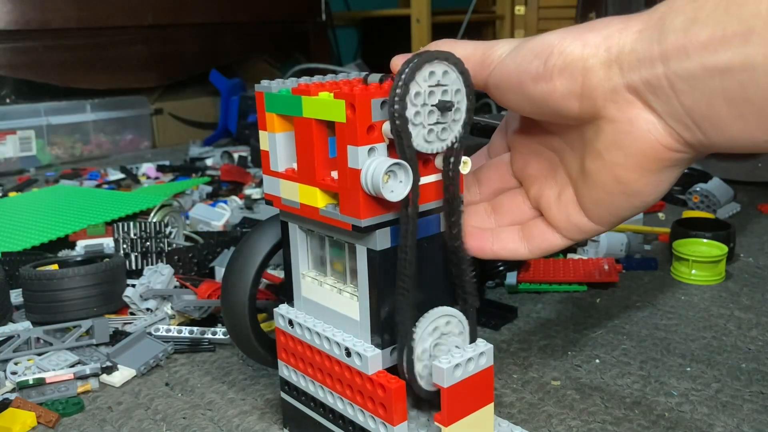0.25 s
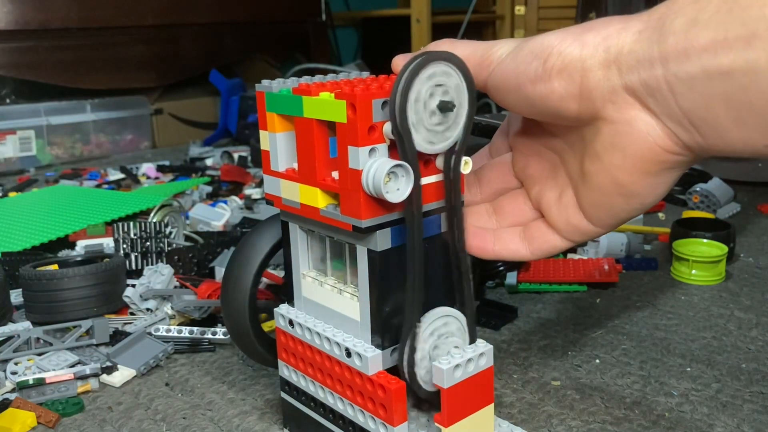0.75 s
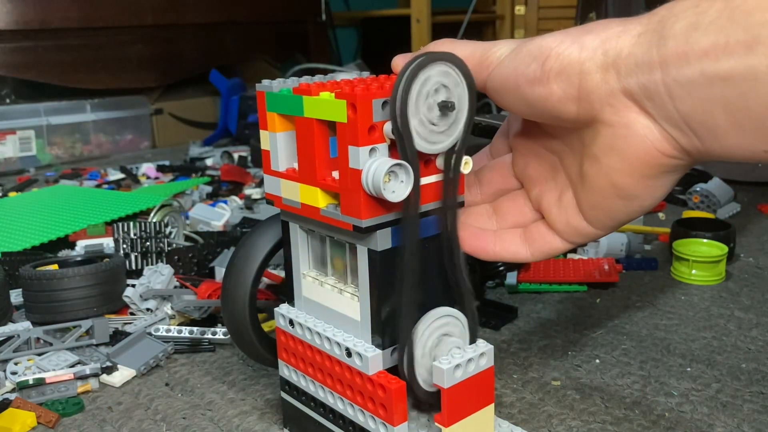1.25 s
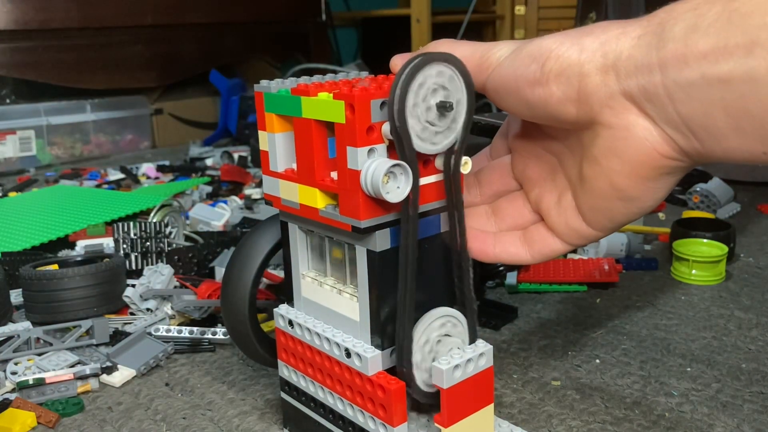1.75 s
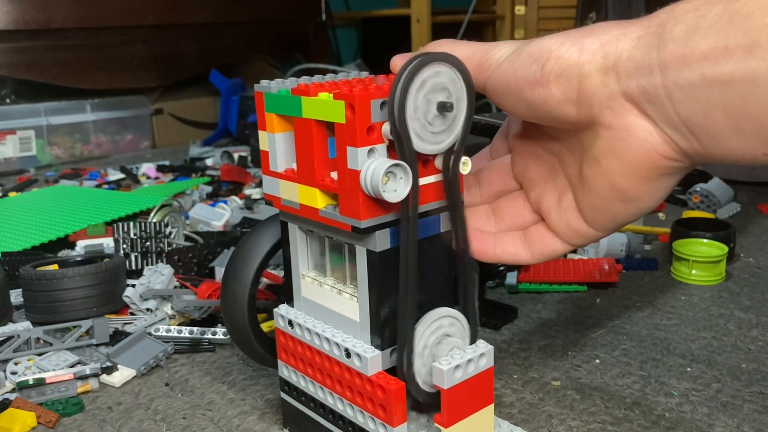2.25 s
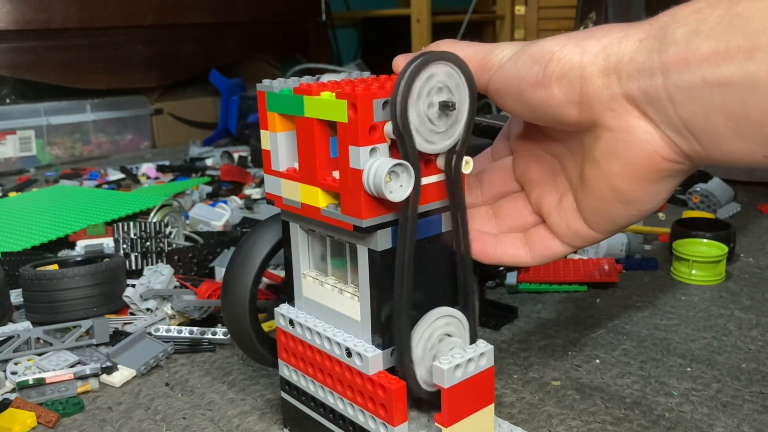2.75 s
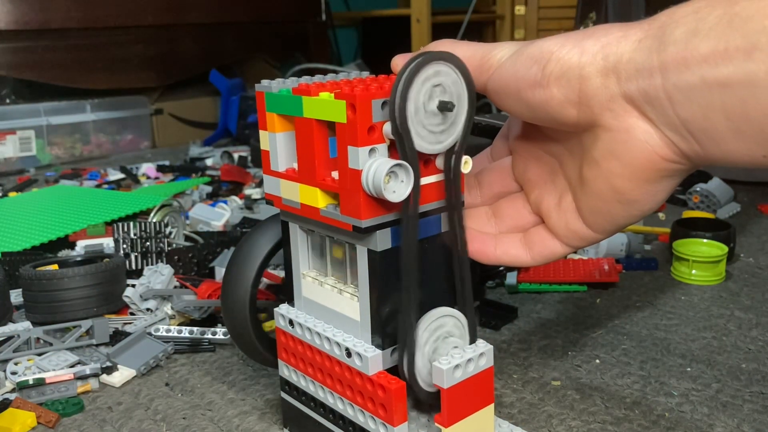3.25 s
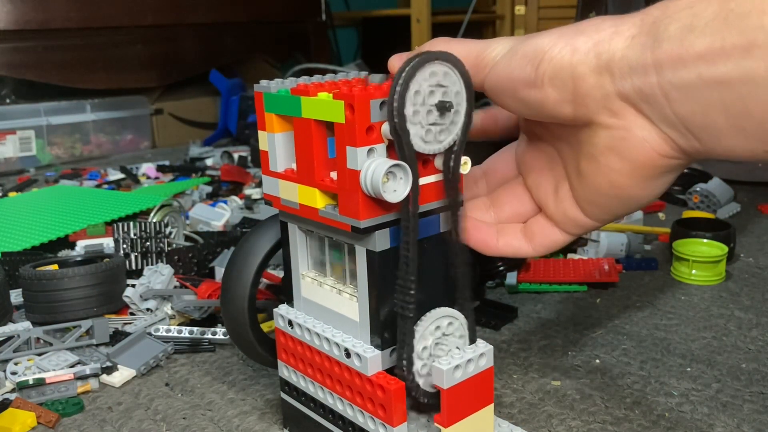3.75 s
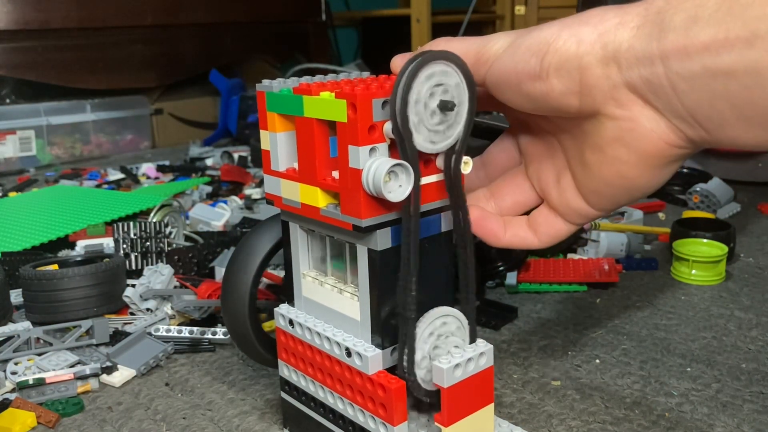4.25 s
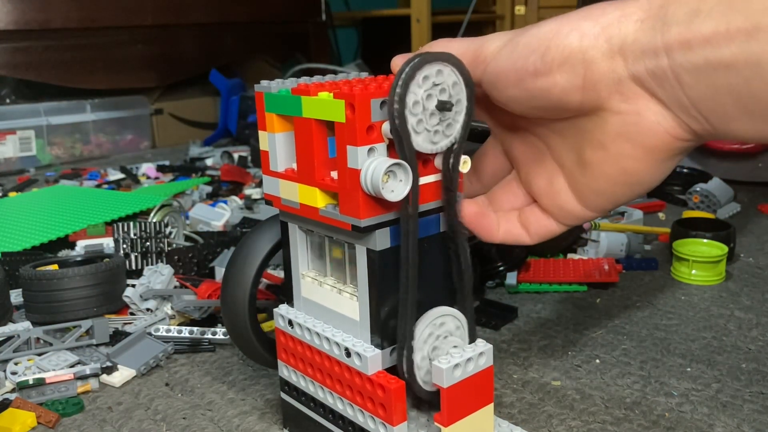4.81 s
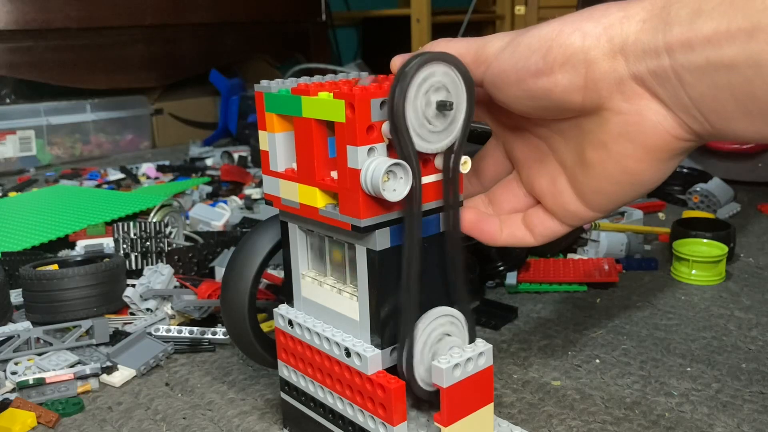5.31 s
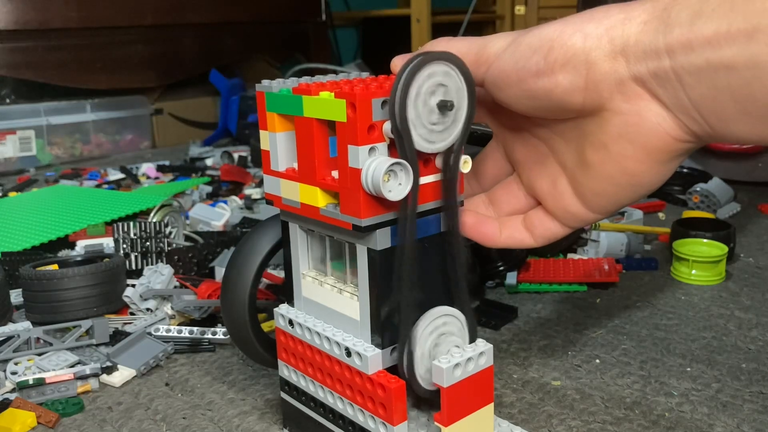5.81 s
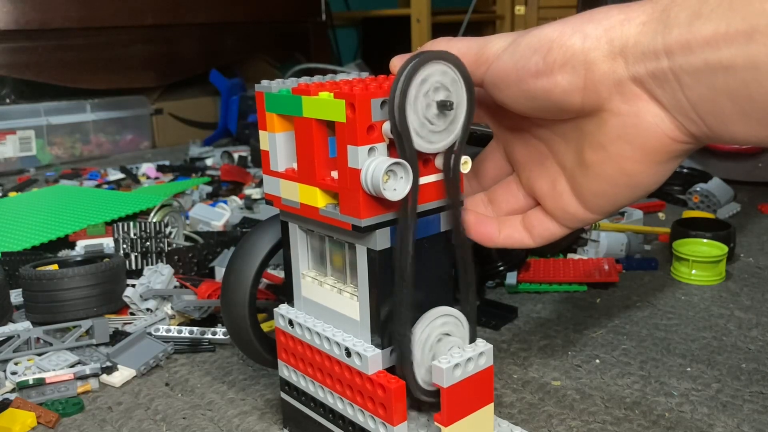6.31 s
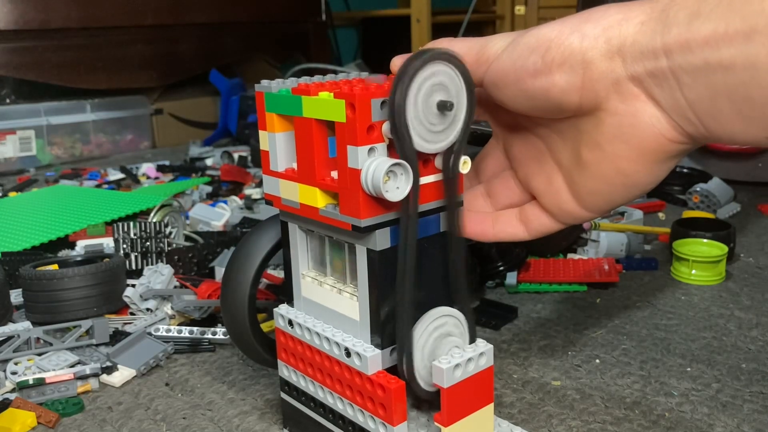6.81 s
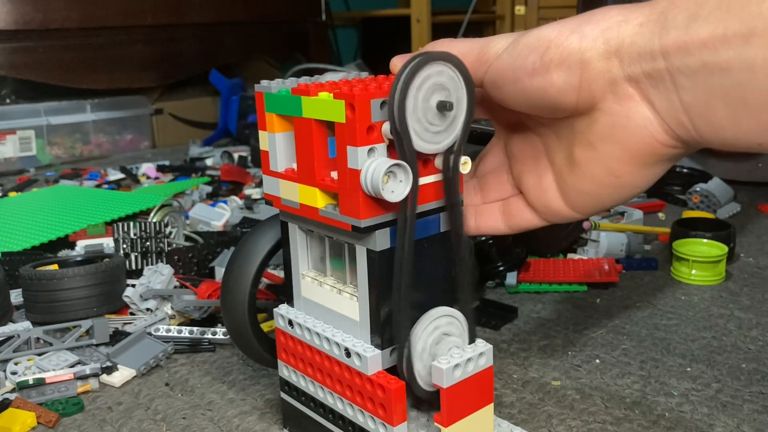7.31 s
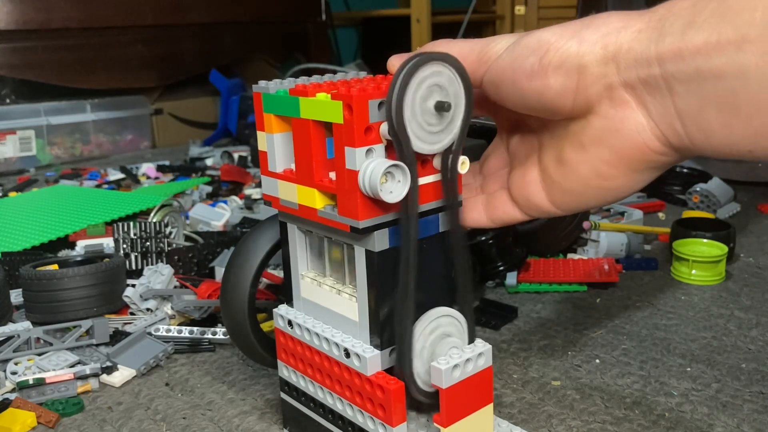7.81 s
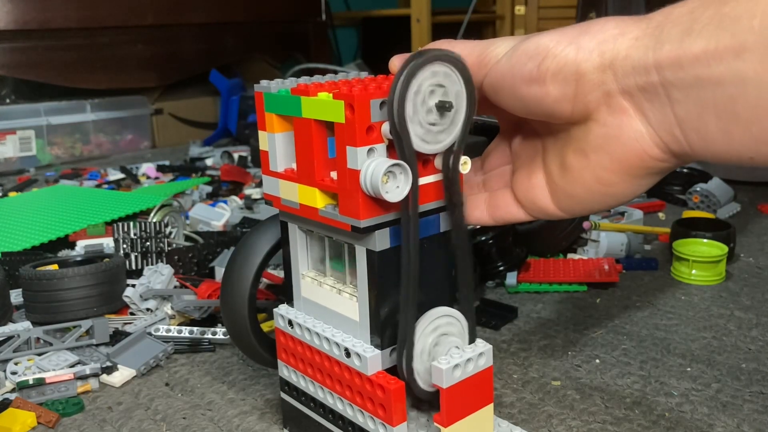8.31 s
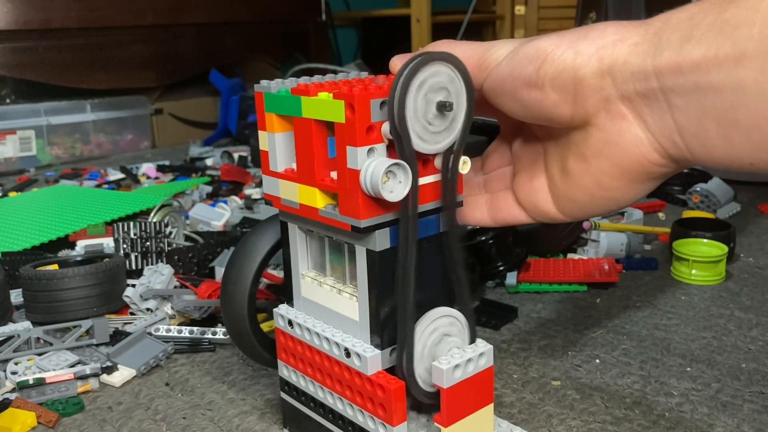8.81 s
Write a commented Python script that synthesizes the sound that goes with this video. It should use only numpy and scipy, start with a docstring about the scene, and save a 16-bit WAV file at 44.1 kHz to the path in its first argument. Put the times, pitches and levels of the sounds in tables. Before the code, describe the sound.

A small plastic-brick engine thumps and clatters in an even rhythm, speeding up midway, over the steady rush and whine of a vacuum cleaner.

```python
"""Toy vacuum engine at close range

A one-cylinder engine of plastic bricks runs on a vacuum cleaner's suction, close to a phone in a small room.
Once a turn the valve opens with a soft whump, air hisses in, and it shuts with a thump that rattles the bricks.
It speeds up from about 5.5 to 9 turns a second; filtered noise and motor tones rush and whistle behind it."""
import sys
import numpy as np
from scipy import signal
from scipy.fft import rfft, irfft, next_fast_len
from scipy.io import wavfile
from scipy.ndimage import uniform_filter1d

SR = 44100
rng = np.random.default_rng(int(sys.argv[2]) if len(sys.argv) > 2 else 0)


def put_to_file(sound):
    """Save the sound as 16-bit audio at rate SR, in the file named by the first command-line argument."""
    columns = np.atleast_2d(sound).T  # one column per channel
    safe = np.clip(columns, -1, 1)
    whole_steps = np.round(safe * 32767)
    wavfile.write(sys.argv[1], SR, whole_steps.astype(np.int16))


N = 399546
SIZE = next_fast_len(N + SR // 2)  # leaves room for filter tails
HZ = np.maximum(np.arange(SIZE // 2 + 1) * SR / SIZE, 1)
TIME = np.arange(N) / SR
PORT_LAG_S = .00011  # the right microphone port hears the sound this much later


def undb(db):
    """Decibels to gain."""
    return 10 ** (np.asarray(db) / 20)


def on_log_axis(points):
    """(f/Hz, value) points joined on a log-frequency axis."""
    hz, value = np.transpose(points)
    return np.interp(np.log(HZ), np.log(hz), value)


def filtered(x, response):
    """Pass a sound through a frequency response."""
    return irfft(rfft(x, SIZE) * response, SIZE)[..., :N]


def resonance(hz, width):
    """Response of one damped mode, gain 1 at its centre."""
    return 1 / (1 + 1j * (HZ ** 2 - hz ** 2) / (HZ * width))


def per_blow(response, seconds):
    """Scale a response so that one blow has rms 1 over the given time."""
    return response * np.sqrt(seconds * SR / np.mean(np.abs(response) ** 2))


def blows(times, sizes):
    """An impulse at each time."""
    samples = np.clip(times * SR, 0, N).astype(int)
    return np.bincount(samples, sizes, N + 1)[:N]


def walk(rate):
    """Smooth random wander with a spread near 1, from fresh values drawn at the given rate in Hz."""
    k = int(SR / rate)
    steps = np.repeat(rng.standard_normal(N // k + 1), k)
    return 1.3 * uniform_filter1d(uniform_filter1d(steps, k), k)[:N]


def place(x, left_db, room_db, t60, lag_s):
    """Direct sound, a little earlier on the left, plus dense reflections from floor and clutter."""
    left = np.full(len(HZ), undb(left_db / 2))
    right = undb(-left_db / 2) * np.exp(-2j * np.pi * HZ * lag_s)
    direct = np.array([left, right])
    t = TIME[:SR // 2]
    tail = rng.standard_normal((2, len(t))) * undb(-60 * t / t60) * (t > .001)
    tail /= np.sqrt(np.sum(tail ** 2, axis=1, keepdims=True))
    wet = undb(room_db)
    return filtered(x, (direct + wet * rfft(tail, SIZE)) / np.sqrt(1 + wet ** 2))


# likeness of the air noise at the two microphone ports: f/Hz, coherence/1 (negative = in opposition)
PORT_LIKENESS = [(60, 0.95), (200, 1), (500, 0.67), (1000, 0.62), (2000, 0.78), (3300, 0.55), (4200, 0.014),
                 (4700, 0.033), (5300, 0.06), (6300, 0.19)]


def two_ports(colour, left_db=0):
    """Coloured noise at both ports: alike in the bass, barely related in the treble; its shared part leads left."""
    alike = np.clip(on_log_axis(PORT_LIKENESS), -1, 1)
    ports = np.array([np.ones(len(HZ)), np.sign(alike) * np.exp(-2j * np.pi * HZ * PORT_LAG_S)])
    common = filtered(rng.standard_normal(N), colour * np.sqrt(np.abs(alike)) * ports)
    own = filtered(rng.standard_normal((2, N)), colour * np.sqrt(1 - np.abs(alike)))
    return (common + own) * undb(np.array([[left_db], [-left_db]]) / 2)


# spectrum of the vacuum cleaner's rush: f/Hz, level/dB
RUSH_SPECTRUM = [(30, -44), (70, -15), (150, -29), (225, -16.5), (310, -35.5), (420, -22.5), (560, -24),
                 (720, -25.5), (1700, -25.5), (3200, -28.5), (5500, -30), (7000, -27), (11500, -27),
                 (15500, -31)]
# breathy whistles of the air path: f/Hz, width/Hz (before narrowing), level/dB (rms)
AIR_WHISTLES = [(587, 30, -48), (1018, 40, -52), (1667, 45, -54), (6742, 35, -52), (6808, 25, -51),
                (6872, 22, -53), (7027, 35, -48), (10250, 300, -45), (10596, 35, -42), (12691, 80, -48.5)]
# clean motor tones, being mains hum, shaft and fan whine: f/Hz, level/dB (rms)
MOTOR_TONES = [(120, -43), (588, -48.5), (10596, -43.5)]


def vacuum_cleaner():
    """A steady, slightly fluttering rush with narrow whistles, over the hum and whine of the motor."""
    power = undb(on_log_axis(RUSH_SPECTRUM)) ** 2
    for hz, width, db in AIR_WHISTLES:
        line = np.abs(resonance(hz, 0.86 * width)) ** 4
        power = power + undb(db) ** 2 * line / np.mean(line)
    flutter_db = 0.14 * walk(0.98) + 0.36 * walk(25)
    rush = two_ports(np.sqrt(power), left_db=.5) * undb(flutter_db)

    # the motor's speed wavers slightly
    turning = np.cumsum(1 + 0.000453 * walk(2) + 0.000486 * walk(30)) / SR
    tones = np.zeros(N)
    for hz, db in MOTOR_TONES:
        tones += np.sqrt(2) * undb(db + 0.52 * walk(8.1)) * np.sin(2 * np.pi * hz * turning)
    return rush + tones


# speed of the crank: t/s, speed/(turns/s)
CRANK_SPEED = [(0.0, 5.77), (0.52, 5.367), (1.73, 5.497), (2.67, 5.348), (2.83, 5.727), (2.99, 5.217),
               (3.86, 5.454), (4.52, 6.073), (4.64, 6.988), (5.04, 7.443), (5.34, 8.948), (5.9, 9.49),
               (6.68, 9.044), (6.8, 9.572), (7.14, 9.045), (7.39, 9.51), (8.33, 8.547), (8.45, 8.659),
               (8.72, 8.138), (9.06, 8.253)]
# strength of the suction, as thump level before a small lift; it dips briefly as the engine starts
# to pick up, then grows with speed and eases near the end: t/s, level/dB
SUCTION_LEVEL = [(0.0, -18), (4.46, -18.4), (4.62, -19.5), (4.77, -17), (5.29, -16.5), (5.51, -15.5),
                 (7.35, -15.5), (7.99, -16), (8.34, -17.5), (9.06, -18.5)]
# turns on which a loose brick catches and alters the clack, mostly harder: t/s, extra level/dB
CAUGHT_BRICKS = [(2.092, -1), (5.4, 3.5), (6.909, 2), (8.69, 4.5)]
FIRST_SHUT_S = .077
OPEN_SHARE = .445  # part of each turn for which the valve is uncovered
OPEN_LAG_S = 0.00444  # the air takes this long to start moving
THUMP_SCATTER_DB = 0.3
WHUMP_DB, WHUMP_SCATTER_DB = -8, 1.5  # the opening, relative to the suction-set thump level
EASY_THUMP_DB, EASY_CLACK_DB = -17.5, -28.5  # reference thump level and the clack that goes with it
CLACK_GROWTH, CLACK_SCATTER_DB = 1.82, 1.5  # dB of clack per dB of thump; spread from turn to turn


def strokes():
    """The valve opens and shuts once a turn; suction sets both blows, and clacks grow faster than thumps."""
    turns = np.cumsum(np.interp(TIME, *np.transpose(CRANK_SPEED))) / SR
    turns = turns - np.interp(FIRST_SHUT_S, TIME, turns)
    whole = np.arange(int(turns[-1]) + 1)
    shuts = np.interp(whole, turns, TIME)
    opens = np.interp(whole - OPEN_SHARE, turns, TIME) + OPEN_LAG_S

    chance = rng.standard_normal((len(whole), 3))
    thump_db = np.interp(shuts, *np.transpose(SUCTION_LEVEL)) + THUMP_SCATTER_DB * chance[:, 0]
    whump_db = thump_db + WHUMP_DB + WHUMP_SCATTER_DB * chance[:, 1]
    clack_db = EASY_CLACK_DB + CLACK_GROWTH * (thump_db - EASY_THUMP_DB)
    clack_db += CLACK_SCATTER_DB * chance[:, 2]
    for time, extra_db in CAUGHT_BRICKS:
        clack_db[np.argmin(np.abs(shuts - time))] += extra_db
    return opens, shuts, whump_db, thump_db, clack_db


# spectrum of air drawn through the valve, before gating and flow: f/Hz, level/dB
INTAKE_SPECTRUM = [(150, -44), (400, -26), (750, -24), (1100, -29.5), (1900, -19), (3100, -26.5),
                   (3700, -24.5), (4100, -19.5), (4500, -19.5), (5400, -30), (7000, -21.5), (9500, -29),
                   (10200, -14.5), (12500, -27), (15500, -31)]


def intake(opens, shuts, thump_db):
    """Air hisses in while the valve is open; the stronger the flow, the harder the thump that stops it."""
    opening = blows(opens + 0.00044, np.ones(len(opens)))
    shutting = blows(shuts + 0.0016, np.ones(len(shuts)))
    valve = uniform_filter1d(np.cumsum(opening - shutting), int(0.0028 * SR))
    linger = 1 / (1 + 2j * np.pi * HZ * 0.0075)  # reflections carry part of the power on
    gate = np.sqrt(np.abs(valve + .5 * filtered(valve, linger)) / 1.56)

    flow_db = np.interp(TIME, shuts, thump_db - np.median(thump_db[:20]))
    hiss = two_ports(undb(on_log_axis(INTAKE_SPECTRUM)), left_db=4.0)
    treble = filtered(hiss, 1 / (1 + (7500 / HZ) ** 4))
    # a faster jet gains most in the treble
    body_gain = undb(.5 * flow_db + 0.58 * walk(70))
    treble_gain = undb(1.24 * flow_db + 0.45 * walk(90))
    return gate * ((hiss - treble) * body_gain + treble * treble_gain)


# modes of the brick housing, relative to one another: f/Hz, width/Hz, level/dB
HOUSING_MODES = [(1248, 64, 3), (1390, 260, 1), (1658, 57, 3), (2236, 140, 4.5), (2680, 650, -7),
                 (3370, 80, -4), (4070, 400, -10.5), (7640, 440, 0.5), (11000, 2800, -8)]


def bricks(shuts, thump_db, clack_db):
    """Each thump knocks the loose bricks in a quick flurry; axle and crank tick lightly at random moments."""
    delay = rng.exponential(.0028, (len(shuts), 20))
    share = rng.standard_normal((len(shuts), 20)) * undb(-7.5) * np.exp(-delay / 0.017)
    delay[:, 0], share[:, 0] = 0, 1  # one firm contact leads the flurry
    times = (shuts[:, None] + .0008 + delay).ravel()
    knocks = blows(times, (share * undb(clack_db)[:, None]).ravel())

    # harder blows make shorter contact, so their bright edge grows faster than the thump
    edge_db = -31 + 3.0 * (thump_db - np.percentile(thump_db, 80))
    edges = blows(times, (share * undb(edge_db)[:, None]).ravel())
    chance = rng.random((120, 2))
    ticks = blows(chance[:, 0] * N / SR, undb(-44 + 15.5 * chance[:, 1] ** 2))

    # the housing rings with every contact
    housing = sum(undb(db) * resonance(hz, width) for hz, width, db in HOUSING_MODES)
    bright = housing * resonance(hz=4280, width=2500)
    clacks = filtered(knocks, per_blow(housing, 0.0042))
    clicks = filtered(edges + ticks, per_blow(bright, 0.0025))
    return place(clacks + clicks, left_db=3.5, room_db=-5, t60=.1, lag_s=.00004)


# pressure pulse of the stopped air column, before its level is set per blow: f/Hz, level/dB
HAMMER_SPECTRUM = [(22, -48), (38, -14), (55, 1.5), (72, -1), (120, 0), (195, 0), (280, -13), (430, -5),
                   (550, -8), (640, -14), (810, -12.5), (950, -27.5), (1300, -25), (3000, -32), (8000, -55)]


def air_hammer(opens, shuts, whump_db, thump_db):
    """Starting and stopping the air column gives opposite pulses; lows arrive late, so each chirps down."""
    lag_cycles, zero_phase_hz = 1.14, 510  # each frequency arrives this many of its own cycles late
    chirp = np.exp(-2j * np.pi * lag_cycles * np.log(HZ / zero_phase_hz))
    # part of each pulse comes back from the far end of the hose
    echo = 1 - 1j * undb(-14) * np.exp(-2j * np.pi * HZ * .0233) / (1 + (HZ / 500) ** 2)
    cylinder = 1 + undb(8) * resonance(hz=735, width=38.5)  # the hollow body rings on briefly
    pulse = undb(on_log_axis(HAMMER_SPECTRUM)) * chirp * echo * cylinder
    gentle = 1 / (1 + (HZ / 210) ** 4)  # the port opens gradually
    thump = filtered(blows(shuts, undb(thump_db + 0.62)), per_blow(pulse, 0.014))
    whump = filtered(blows(opens, -undb(whump_db)), per_blow(pulse * gentle, 0.023))
    return place(thump + whump, left_db=0.84, room_db=-16.5, t60=0.059, lag_s=PORT_LAG_S)


def scene():
    """The vacuum cleaner behind, the engine close by."""
    background = vacuum_cleaner()
    opens, shuts, whump_db, thump_db, clack_db = strokes()
    hiss = intake(opens, shuts, thump_db)
    rattle = bricks(shuts, thump_db, clack_db)
    hammer = air_hammer(opens, shuts, whump_db, thump_db)
    return background + hiss + rattle + hammer


WIDEN_HZ, WIDEN_LAG_S = 6300, .00022
TOP_HZ = 15900


def record(dry):
    """The phone widens the treble from one port, inverted and late on the left; then it cuts the top."""
    treble = 1 / (1 + (WIDEN_HZ / HZ) ** 60)  # share of the power that is widened
    widen = np.array([-np.exp(-2j * np.pi * HZ * WIDEN_LAG_S), np.ones(len(HZ))])
    wide = filtered(dry, np.sqrt(1 - treble)) + filtered(dry[1], widen * np.sqrt(treble))
    top_cut = signal.ellip(10, .2, 80, TOP_HZ, fs=SR, output="sos")
    return signal.sosfilt(top_cut, wide)


dry = scene()
out = record(dry)
put_to_file(out)
```